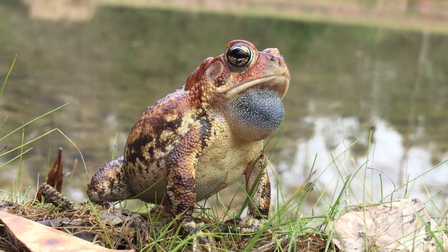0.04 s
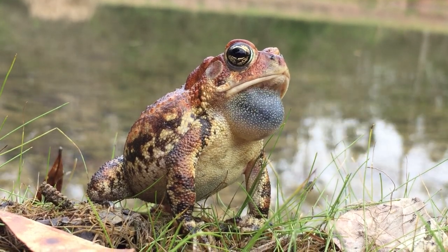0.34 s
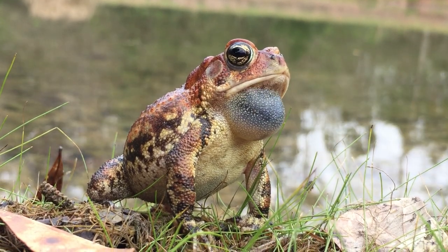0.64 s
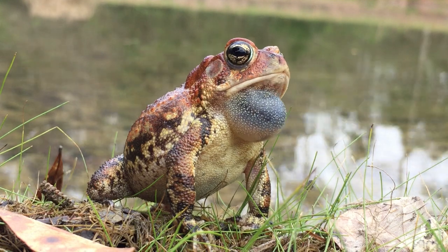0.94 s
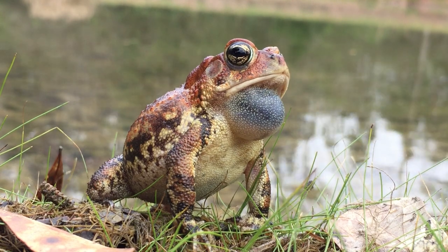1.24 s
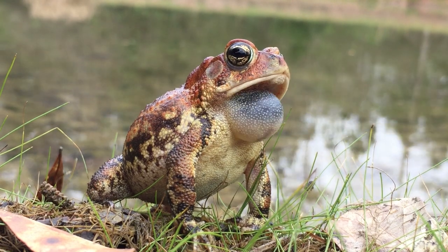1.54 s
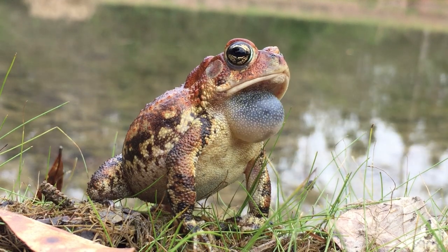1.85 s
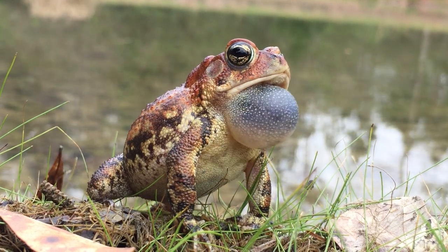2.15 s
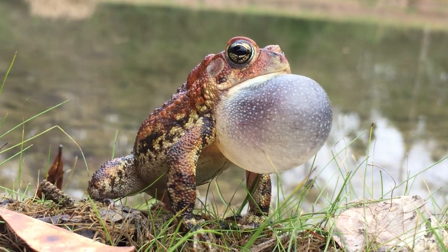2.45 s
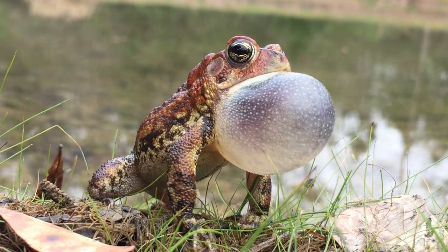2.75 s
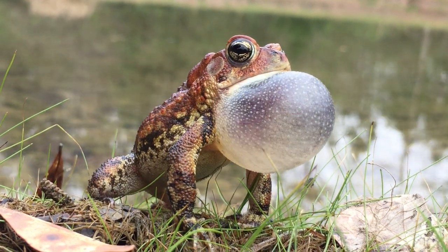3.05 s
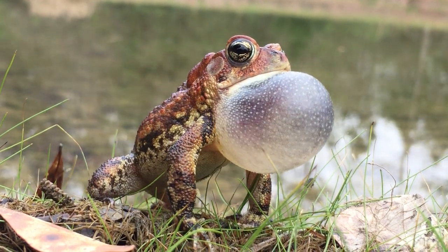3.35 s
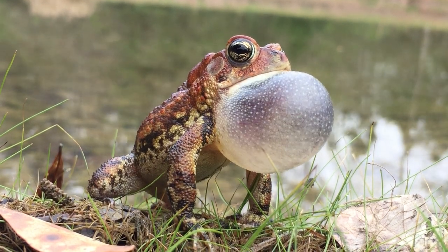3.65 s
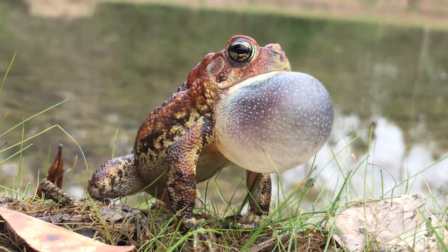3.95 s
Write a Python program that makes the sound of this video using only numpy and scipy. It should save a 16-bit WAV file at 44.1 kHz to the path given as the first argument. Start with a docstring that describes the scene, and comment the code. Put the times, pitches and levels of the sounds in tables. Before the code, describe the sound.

A toad breaks into a loud, high trill while others trill faintly across a pond.

```python
"""From the start, toads trill across a pond over a soft outdoor rush. In the first two seconds or so come
small ticks by the water and two faint bird whistles. At 2.4 s a toad close to the microphone fills its
throat sac and trills: about 55 short, falling tone pulses a second, each a puff of air that sets its
membranes vibrating. The trill starts rough, climbs in pitch and settles, while the recorder rounds the
loudest pulses and turns its gain down."""
import sys
import numpy as np
from scipy import signal
from scipy.fft import rfft, irfft, next_fast_len
from scipy.io import wavfile
from scipy.ndimage import uniform_filter1d, map_coordinates

SR = 44100
rng = np.random.default_rng(int(sys.argv[2]) if len(sys.argv) > 2 else 0)


def dump_mix(stems):
    """Bounce the given channels to the path in sys.argv[1] as a 16-bit WAV at rate SR."""
    frames = np.atleast_2d(stems).T  # one column per channel
    limited = np.clip(frames, -1, 1)  # hard clip at full scale
    pcm = np.round(limited * 32767).astype(np.int16)
    wavfile.write(sys.argv[1], SR, pcm)


N = 176400


def amp(db):
    """Amplitude ratio of a level in decibels."""
    return 10 ** (np.asarray(db) / 20)


def unit(x):
    """Normalisation to rms 1."""
    return x / np.sqrt(np.mean(x ** 2) + 1e-20)


def clock():
    """Sample times in seconds."""
    return np.arange(N) / SR


def curves(rows, t):
    """Linear interpolation, at t, of each column after the time."""
    times, *columns = np.transpose(rows)
    return [np.interp(t, times, column) for column in columns]


def along(points, hz):
    """Interpolation of (f/Hz, value) points on a logarithmic frequency axis."""
    f, values = np.transpose(points)
    return np.interp(np.log(hz + 1), np.log(f + 1), values)


def wobble(rate):
    """Random modulation: a spline through rate Gaussian knots a second."""
    return map_coordinates(rng.standard_normal(int(N * rate / SR) + 4), [clock() * rate])


def coloured(x, points):
    """Minimum-phase filtering: folding the cepstrum makes the (f/Hz, gain/dB) response causal."""
    m = 2 * next_fast_len(N)
    gain = amp(along(points, np.fft.rfftfreq(m, 1 / SR)))
    cepstrum = irfft(np.log(gain), m)
    cepstrum[1:m // 2] *= 2
    cepstrum[m // 2 + 1:] = 0
    return irfft(rfft(x, m) * np.exp(rfft(cepstrum)), m)[:N]


def noise(points):
    """Spectrally shaped Gaussian noise of rms 1."""
    return unit(coloured(rng.standard_normal(N), points))


def pulse_clock(rate, start):
    """Integrating the pulse rate gives each sample its pulse number and the time since that pulse began."""
    turns = np.cumsum(rate) / SR
    turns = turns - np.interp(start, clock(), turns)
    return np.floor(np.maximum(turns, 0)).astype(int), turns % 1 / rate


def swell(u, crest):
    """Pulse envelope: a half sine over u = 0..1, skewed to peak at crest."""
    u, crest = np.clip(u, 0, 1), np.clip(crest, .05, .95)
    return np.abs(np.sin(np.pi * u / (u + crest / (1 - crest) * (1 - u))))


def bank_echo(x):
    """Diffuse reflection from the banks: convolution with exponentially decaying noise."""
    decay_times = [(200, .3), (2200, 1), (10000, .2)]  # reverberation time: f/Hz, T60/s
    hz, t, spectra = signal.stft(rng.standard_normal(SR // 2), SR, nperseg=256)
    decay = amp(-60 * t / along(decay_times, hz)[:, None])
    tail = signal.istft(spectra * decay, SR, nperseg=256)[1]
    return signal.fftconvolve(x, tail / np.linalg.norm(tail))[:N]


def air(toads, hiss_depth=0.75):
    """Ambient noise: rush, rumble and a hiss, mostly distant toads' rasp, modulated by their envelope."""
    # spectra of the three noises: f/Hz, relative level/dB
    rush_spectrum = [(25, -51.5), (110, -16.5), (220, -15), (400, -6.5), (510, -12), (700, -0.5),
                     (850, -0.5), (1100, 0), (1450, -3), (1900, 5), (2700, -14), (3500, -17), (6000, -34.5),
                     (12000, -55)]
    rumble_spectrum = [(15, -62), (28, -28), (40, -12.5), (70, 1.5), (100, -0.5), (150, -2.5), (250, -8),
                       (330, -14), (420, -14.5), (520, -27), (3000, -66.5)]
    hiss_spectrum = [(300, -20), (2000, -7), (2750, -1.5), (3050, 5), (3700, -7.5), (4450, -1),
                     (4950, -16.5), (5700, -17.5), (6300, -10.5), (7000, -15.5), (7700, -26), (8700, -14.5),
                     (9400, -28.5), (11700, -22), (13000, -31), (15500, -30.5)]
    air_levels = [(0, -47, -53.5), (.6, -44.5, -54.5), (1.05, -43.5, -51.5), (1.27, -41.5, -49.5),
                  (1.5, -42, -49.5), (2.3, -41.5, -46), (2.75, -38.5, -44), (3.3, -39, -44.5),
                  (4, -47, -44)]  # t/s, rush level/dB, rumble level/dB
    hiss_levels = [(0, -56), (1.2, -56.5), (2.3, -55), (3, -63), (4, -56.5)]  # t/s, level/dB
    rush_db, rumble_db = curves(air_levels, clock())
    envelope = unit(np.abs(signal.hilbert(toads)))
    pulsing = unit(1 - hiss_depth + hiss_depth * envelope)
    rush = noise(rush_spectrum) * amp(rush_db + 0.29 * wobble(rate=5.7))
    rumble = noise(rumble_spectrum) * amp(rumble_db + 0.82 * wobble(rate=8))
    hiss = noise(hiss_spectrum) * pulsing * amp(curves(hiss_levels, clock())[0])
    return rush + rumble + hiss


def chorus():
    """Incoherent summation: many distant toads blur into a band of noise."""
    spectrum = [(500, -85), (1300, -61.5), (1700, -25.5), (1950, -10), (2060, 4), (2330, -2.5),
                (2480, -4.5), (2600, -18.5), (2750, -39.5), (3300, -58.5), (6000, -89.5)]  # f/Hz, relative level/dB
    levels = [(0, -33), (2.6, -30), (3.1, -28.5), (4, -34.5)]  # t/s, level/dB
    return noise(spectrum) * amp(curves(levels, clock())[0] + 0.42 * wobble(rate=4.0))


def bird():
    """Frequency modulation: a distant bird's whistles glide down with a random flutter."""
    whistles = [(1.05, 0.21, 6370, 5980, -65.5), (1.744, 0.32, 6340, 5560, -64.5)]  # onset t/s, duration/s, first f/Hz, last f/Hz, level/dB
    t, out = clock(), np.zeros(N)
    for start, length, high_hz, low_hz, db in whistles:
        u = np.clip((t - start) / length, 0, 1)
        hz = high_hz + (low_hz - high_hz) * u ** 2 + 110 * wobble(rate=400)
        envelope = amp(db + 3 * wobble(rate=70)) * swell(u, 0.44) ** .5
        out += envelope * np.sin(2 * np.pi * np.cumsum(hz) / SR)
    return out


def ticks():
    """Damped transients by the water: narrow bands of noise that decay exponentially."""
    events = [(0.407, 8450, .015, -56), (0.505, 11670, 0.023, -57), (0.737, 7400, 0.019, -54),
              (0.81, 5200, .02, -52.5), (1.453, 6800, 0.0115, -54), (1.503, 8660, 0.017, -56),
              (2.071, 3900, 0.013, -38), (2.23, 970, 0.024, -33)]  # onset t/s, centre f/Hz, T60/s, level/dB
    t, out = clock(), np.zeros(N)
    for start, hz, t60, db in events:
        age = np.maximum(t - start, 0)
        envelope = amp(db - 60 * age / t60) * (1 - np.exp(-age / 0.00067))
        out += envelope * noise([(hz / 2, -45), (hz, 0), (hz * 2, -45)])
    return out


def far_toad(start, end, pitch, rate, slowing, db):
    """Direct plus reverberant sound: a train of falling chirps that slows as the toad tires."""
    glide_hz, glide_s = 287, 0.1  # the trill slides up at first
    pulse_s, sag_hz, overtone_db, echo_db = 0.01, 132, -44, -10
    t = clock()
    since = np.maximum(t - start, 0)
    index, age = pulse_clock((rate - slowing * t) * (1 + .003 * wobble(rate=6)), 0)
    u = age / pulse_s
    hz = pitch * (1 + 0.012 * wobble(rate=17)) - glide_hz * np.exp(-since / glide_s)
    onset_phase = rng.normal(0, 1.1, index.max() + 1)[index]
    phase = 2 * np.pi * age * (hz + sag_hz * (1 - u) / 2) + onset_phase
    harmonics = amp(overtone_db) * (np.sin(2 * phase) + np.sin(3 * phase))
    trill = swell(u, .4) * (np.sin(phase) + harmonics)
    trill = np.roll(trill, rng.integers(SR // 50))  # the toads are out of step
    band = signal.butter(2, [1700, 2750], 'bandpass', fs=SR, output='sos')
    trill = unit(signal.sosfilt(band, trill))
    fade = (1 - np.exp(-since / 0.23)) * np.clip((end - t) / 0.24, 0, 1)
    return amp(db) * fade * unit(trill + amp(echo_db) * unit(bank_echo(trill)))


def sac_ring(age, scatter_db, t60=0.04):
    """Damped free vibration: the sac rings thinly with each pulse, its pitch sinking as it fills."""
    resonance = [(2.5, 9900, -75), (2.58, 9650, -43.5), (2.75, 9650, -44), (3.1, 9420, -66), (4, 9800, -57)]  # t/s, f/Hz, level/dB relative to the pulse
    hz, db = curves(resonance, clock() - age)
    envelope = amp(db + scatter_db - 60 * age / t60) * (1 - np.exp(-age / 0.0018))
    return envelope * np.sin(2 * np.pi * hz * age)


def membrane_snap(age, delay_s=0.001167, puff_s=.005):
    """Impulse excitation: the membranes snap open, and a faint puff of air dies away."""
    response = [(300, -31), (720, -30.5), (950, -1), (1200, -6), (1450, 8), (2300, 5.5), (2800, -4),
                (3250, -1), (4200, -32), (6500, -12.5), (8500, -28.5), (11500, -34.5), (14000, -62)]  # colour of the snap: f/Hz, gain/dB
    opened = np.clip((age - delay_s) * SR, 0, 1)
    click = np.diff(opened, prepend=0).clip(0)
    puff = rng.standard_normal(N) * np.exp(-age / puff_s)
    return coloured(amp(-0.5) * click + amp(-27) * puff, response)


def membrane_tone(phase, u, crest, rough, flap_scatter_db, flap_stretch):
    """Radiation through the sac: the fundamental, pulsed, with a weak after-swing in antiphase."""
    radiation = [(400, -26), (1100, -8.5), (1400, 1), (1800, 2.5), (2100, -4), (2400, 3.5), (2600, 1),
                 (2850, -8.5), (3200, 2.5), (3600, -13), (5000, 0.5)]  # response of the sac: f/Hz, gain/dB
    flap_db = -23 + 19 * np.minimum(rough, .3) + flap_scatter_db
    flap_length = 0.19 * np.exp(.08 * flap_stretch)  # as a share of the pulse
    flap = amp(flap_db) * swell((u - 1) / flap_length, 0.75)
    envelope = swell(u, crest) ** 0.75 - flap
    tone = envelope * np.sin(phase) * (1 + .6 * rough * wobble(rate=600))
    return coloured(tone, radiation)


def near_toad(start_s=2.3988, pulse_s=0.0083, steady_s=.27, droop_hz=220):
    """Source and filter: each puff restarts the membranes, whose pitch falls as it runs out."""
    pulse_rate = [(2.4, 55.27), (2.52, 56.72), (2.62, 58.16), (2.8, 56.68), (3.0, 55.79), (3.2, 54.33),
                  (3.4, 54.69), (3.6, 53.28), (4.0, 52.65)]  # t/s, pulse rate/Hz
    effort = [(2.4, -20.5), (2.44, -10), (2.46, -5), (2.6, -3.5), (2.7, 0.5), (2.8, 3), (3.0, 3), (3.3, 4),
              (4, 0.5)]  # t/s, pulse level/dB before filtering
    voice = [(2.4, 1665, 277, 0.11), (2.47, 2050, 340, 0.08), (2.62, 2180, 370, 0.18),
             (2.8, 2319, 256, 0.33), (3.1, 2362, 132.6, 0.45), (4, 2368, 107.3, 0.46)]  # t/s, pulse onset f/Hz, linear fall/Hz, crest position (0-1)
    brightness = [(2.4, -36.5, -46.5), (2.55, -38, -51.5), (2.8, -34, -49.5), (3.1, -29.5, -62),
                  (4, -32.5, -63.5)]  # t/s, overtone gain/dB, rasp gain/dB
    rasp_spectrum = [(1000, -16), (2300, 4), (2850, 14), (3600, -3), (7600, -1), (8500, -6.5), (12000, -1),
                     (13200, -13), (15500, -5)]  # f/Hz, relative level/dB
    throat = [(2500, -6.5), (3200, 10), (3850, 13), (4050, 5), (4300, -11.5), (4620, -5.5), (4900, -19),
              (5500, -7.5), (6250, 9.5), (6700, -5.5), (7050, -14.5), (7500, -1), (8500, -21), (9400, -23),
              (10100, -29.5), (10800, -11.5), (11500, -5), (12100, -19), (12500, -19.5), (13300, -25),
              (15500, -33.5)]  # response of throat and sac to the overtones: f/Hz, gain/dB
    t = clock()
    index, age = pulse_clock(curves(pulse_rate, t)[0], start_s)
    onset, u = t - age, age / pulse_s
    pitch, sag_hz, crest = curves(voice, onset)
    rough = .65 * np.exp(-np.maximum(t - start_s, 0) / steady_s)
    scatter = rng.standard_normal((index.max() + 1, 6))[index].T  # drawn once per pulse
    jitter, flap_scatter_db, shimmer, ring_scatter, flap_stretch, phase_scatter = scatter

    closing = np.minimum(u, 1.05)
    hz = pitch * (1 + .015 * rough * jitter) - sag_hz * closing - droop_hz * closing ** 6
    cycles = np.cumsum(hz) / SR
    phase = 2 * np.pi * (cycles - np.interp(onset, t, cycles))  # restarts with each pulse
    phase += .5 * phase_scatter + .4 * rough * wobble(rate=500)
    tone = membrane_tone(phase, u, crest, rough, flap_scatter_db, flap_stretch)

    overtone_db, rasp_db = curves(brightness, t)
    overtones = sum(np.sin(k * (phase + .05 * wobble(rate=2000))) for k in range(2, 6))
    overtones *= swell(u, 0.2) ** 0.41 * amp(overtone_db)
    rasp = noise(rasp_spectrum) * swell(u, 0.34) ** 1.4 * amp(rasp_db)
    snap = membrane_snap(age)
    ring = sac_ring(age, scatter_db=2.7 * ring_scatter)
    level = amp(curves(effort, onset)[0] + (.12 + rough / 2) * shimmer) * (t >= start_s)
    return level * (tone + ring + snap + rasp) + coloured(level * overtones, throat)


def scene():
    """Superposition, in mono, of the pond's background and the near toad with its faint echo."""
    # toads across the water: start t/s, end t/s, f/Hz, pulse rate/Hz at t = 0, slowing/(Hz/s), level/dB
    neighbours = [(-1.4, 2.9, 2100, 54.3, 2.1, -30.5), (-1, 3.2, 2310, 58, 1.2, -30.5),
                  (1.15, 2.8, 2210, 72, 5, -32), (-1.6, 5, 2200, 52, 1, -40)]
    toad = near_toad()
    toad_echo = amp(-51) * bank_echo(toad)
    others = sum(far_toad(*row) for row in neighbours)
    background = chorus() + air(others) + bird() + ticks() + others
    return (background + toad_echo + toad)[None]


def record(dry, threshold_db=-15.0, settle_s=0.17, ceiling=0.75, hardness=5.0, top_hz=15900):
    """Dynamic compression by slow gain control, then soft clipping and a band limit."""
    power = np.abs(uniform_filter1d(dry ** 2, SR // 18))
    excess_db = np.maximum(10 * np.log10(power + 1e-12) - threshold_db, 0)
    pole = np.exp(-1 / (settle_s * SR))
    x = dry * amp(-signal.lfilter([1 - pole], [1, -pole], excess_db))
    x = x / (1 + np.abs(x / ceiling) ** hardness) ** (1 / hardness)
    m = next_fast_len(N + SR // 2)
    passband = np.fft.rfftfreq(m, 1 / SR) < top_hz
    return irfft(rfft(x, m) * passband, m)[..., :N]


dry = scene()
out = record(dry)
dump_mix(out)
```